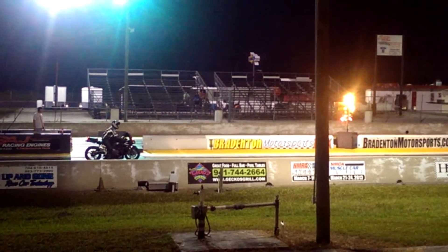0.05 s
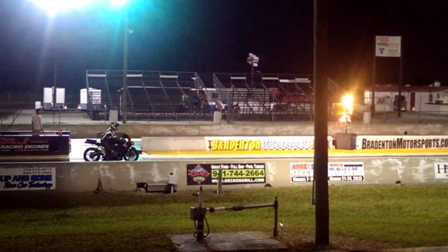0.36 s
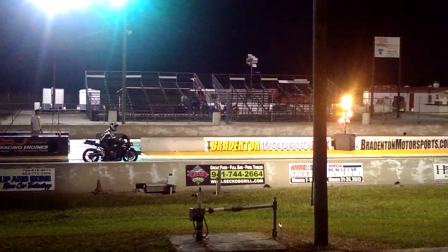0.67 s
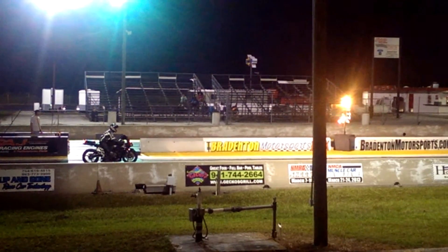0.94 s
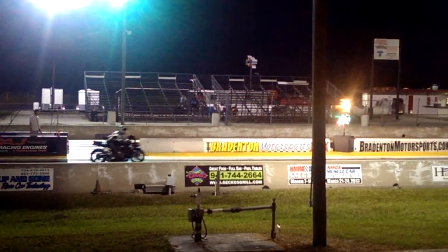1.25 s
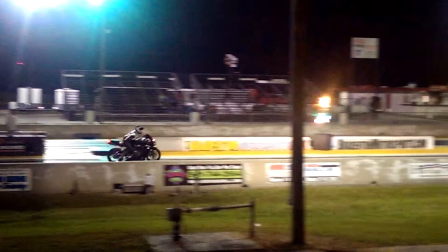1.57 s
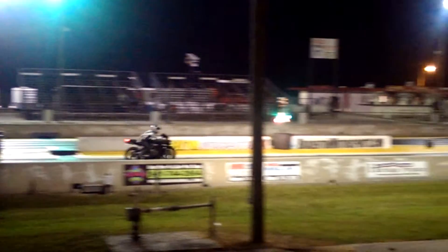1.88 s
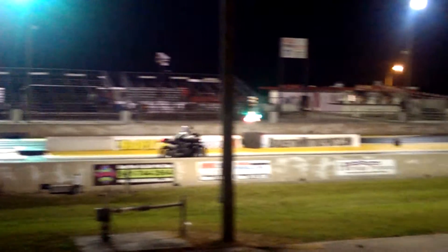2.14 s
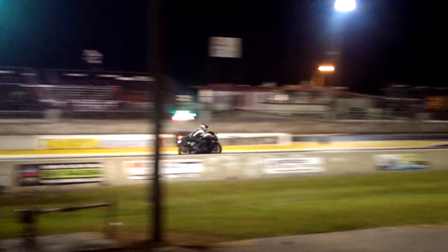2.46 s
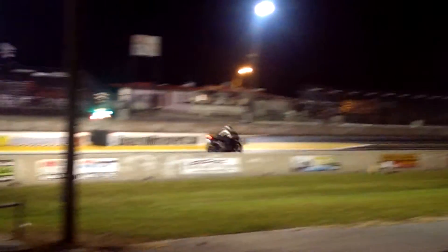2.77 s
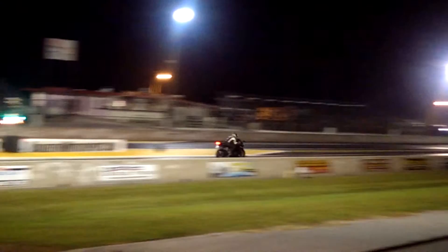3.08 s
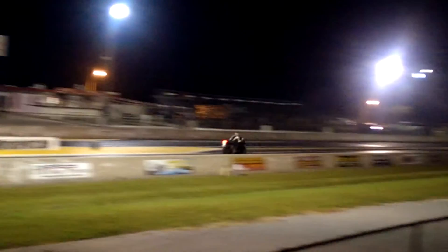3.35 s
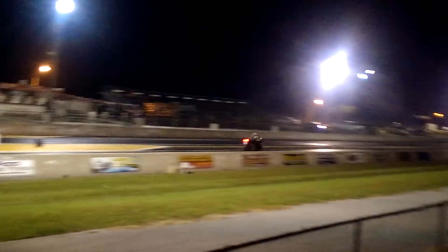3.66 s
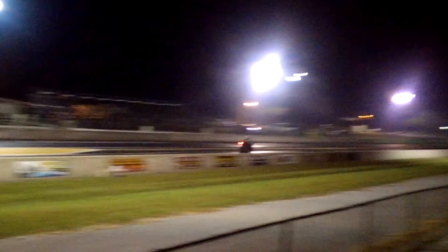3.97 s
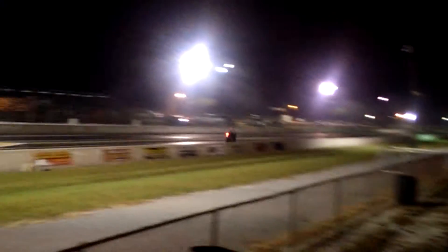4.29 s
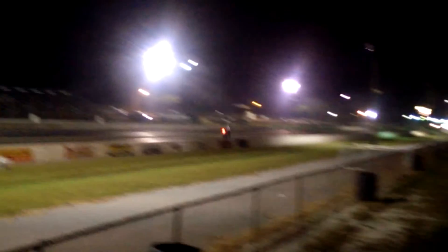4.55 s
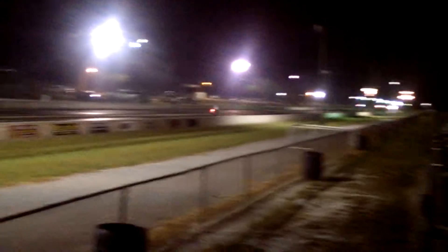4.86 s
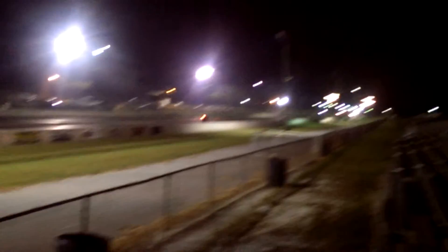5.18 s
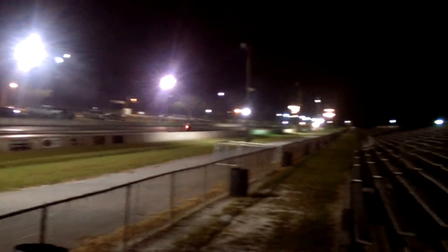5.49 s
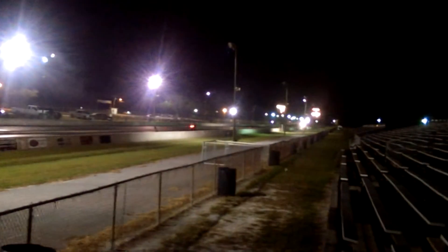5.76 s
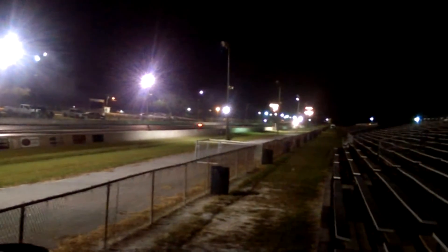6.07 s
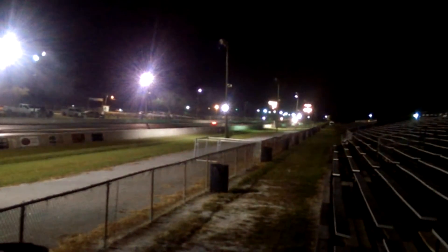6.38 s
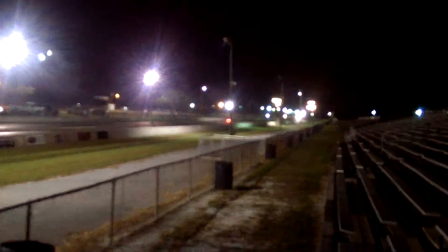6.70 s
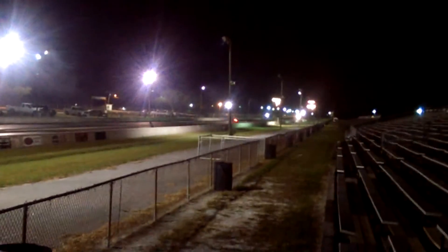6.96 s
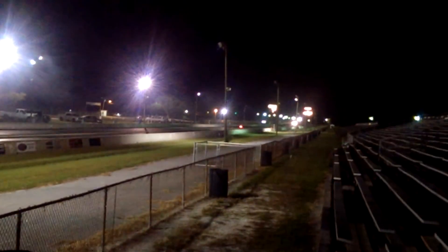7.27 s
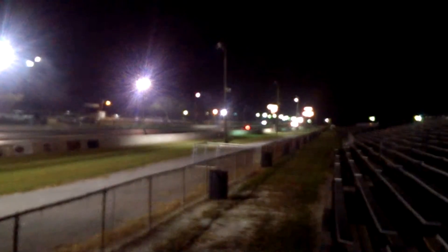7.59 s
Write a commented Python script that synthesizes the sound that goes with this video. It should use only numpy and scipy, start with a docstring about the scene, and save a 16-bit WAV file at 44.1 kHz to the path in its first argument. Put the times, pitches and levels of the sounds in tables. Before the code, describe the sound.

A four-cylinder motorcycle holds a muffled, slightly lumpy hum on the start line of an outdoor drag strip, over a low rumble with faint engine clatter. At about 1 second it launches with a pop and the revs flare loudly, peaking near 1.4 seconds, then sag as the clutch bites. From about 2.5 seconds the throttle opens wide and the pitch climbs steadily into a booming, barking howl with a raspy edge as the bike runs away. Around 5.3 seconds the engine stutters on its rev limiter with a few sharp pops, then shifts up at 5.6 seconds, dropping in pitch and pulling again. The howl wavers and fades with distance. A fainter stutter, pop and second upshift come at about 7.5 to 7.7 seconds. Heard from trackside, the exhaust echoes off the walls and stands throughout.

```python
"""A four-cylinder motorcycle hums on the start line of a drag strip, over the rumble of the grounds.
Track walls and stands throw its sound back. After a second it launches with a pop: the revs flare,
sag as the clutch bites, then climb. Every firing is a pressure spike on top of the exhaust pipe's boom.
The pipe swings round to face the listener as the bike runs away. Twice the engine stutters and pops
on its rev limiter and shifts up, while it fades into the distance."""
import sys
import numpy as np
from scipy import signal
from scipy.fft import rfft, irfft
from scipy.io import wavfile
from scipy.ndimage import uniform_filter1d, map_coordinates

SR = 44100
rng = np.random.default_rng(int(sys.argv[2]) if len(sys.argv) > 2 else 0)


def unload_wav(signal):
    """Save mono or channel-first audio to the path in sys.argv[1] as 16-bit WAV at rate SR, clipped to [-1, 1]."""
    wavfile.write(
        sys.argv[1],
        SR,
        np.round(np.clip(np.atleast_2d(signal).T, -1, 1) * 32767).astype(np.int16),
    )


N = 345744
T = np.arange(N) / SR

# tones of the start-line hum and of its whine: (multiple of the firing rate, relative level [dB])
HUM_TONES = [(0.25, -38), (0.5, -20), (0.75, -25), (1, -2), (1.25, -11), (1.5, -9.5), (1.75, -21), (2, 1.5),
             (2.25, -40), (2.5, -23), (2.75, -32), (3, -10)]
WHINE_TONES = [(4, -20), (6, -21.5)]
# loudness of that hum: (time [s], level [dB])
HUM_LEVEL = [(0, -27.5), (.45, -29.5), (.7, -31.5), (1.0, -27.5), (1.1, -30), (1.2, -47)]
# rumble of the grounds with engine clatter: (frequency [Hz], relative level [dB])
RUMBLE_COLOUR = [(25, -40), (45, -9), (100, -12.5), (220, -7.5), (330, -13), (420, -26.5), (650, -18),
                 (950, -22), (1100, -26.5), (2200, -29.5), (2630, -22.5), (3100, -31), (3900, -31.5),
                 (4600, -37), (6500, -35.5), (7500, -43.5), (10500, -52), (13700, -45.5), (15500, -57)]
# the revs flare, then sag as the clutch bites: (time [s], firing rate [Hz])
LAUNCH_REVS = [(1.0, 108.2), (1.06, 125.6), (1.142, 181.9), (1.198, 221), (1.238, 236.6), (1.312, 262.1),
               (1.406, 269.2), (1.516, 248.8), (1.662, 193.8), (1.694, 189.8), (1.962, 193), (2.46, 138.1)]
# the rider feeds in throttle, backs off, then opens it wide: (time [s], opening [0-1])
THROTTLE = [(1.0, 0), (1.04, 0.06), (1.08, 0.04), (1.16, 0.41), (1.32, 0.52), (1.55, 0.45), (1.68, 0.39),
            (2.12, 0.36), (2.46, 0.11), (2.68, .25), (2.79, 0.55), (3.2, 0.97)]
# boom of the pipe from the side and from behind: (firing rate [Hz], level [dB])
BOOM_BESIDE = [(108, -36), (128, -26), (158, -15.5), (182, -18.5), (194, -14.5), (228, -14.5), (246, -16.5),
               (263, -27)]
BOOM_BEHIND = [(180, -15.5), (218, -25), (245, -19), (268, -20.5), (290, -16.5), (324, -14.5), (338, -22),
               (380, -21.5)]
# slow throb of unequal cylinders: (multiple of the firing rate, relative level [dB])
THROB_TONES = [(.25, -4.5), (.5, -11.5), (.75, -6.5), (1.25, -2), (1.5, -1.5)]
# what the pipe lets out of the throb and the boom's octave: (frequency [Hz], gain [dB])
PIPE_COLOUR = [(30, -23.5), (60, -4), (88, -6), (130, 11), (190, -3.5), (250, 4), (325, 0.5), (352, -0.5),
               (400, -10), (520, -14.5), (760, -21)]
# the four firings at full unevenness: (strength [dB], lateness [s])
CYLINDERS = [(3.5, 0), (-2.5, .00012), (-3.5, -.00006), (0, .00018)]
# exhaust bark from the side and behind, its crack, thump and pop: (frequency [Hz], gain [dB])
BARK_BESIDE = [(100, -10.5), (380, 0.5), (480, -0.5), (700, 4.5), (820, 1.5), (960, 8), (1130, 0),
               (1400, 5.5), (1700, -1), (1950, 4), (2300, -4), (2750, 1.5), (3100, -13), (3900, -4.5),
               (4700, -31), (6400, -17), (7500, -39.5)]
BARK_BEHIND = [(100, 3), (420, -9), (520, -1), (690, 3), (870, 5.5), (1130, -5.5), (1400, 2.5), (1650, 5.5),
               (1950, 8.5), (2350, 0), (2800, -6.5), (3600, -7.5), (5000, -22.5), (14000, -50.5)]
CRACK_COLOUR = [(600, -9), (2300, 7), (3300, 7), (4000, 5.5), (4800, 5.5), (6500, 0), (9000, -4.5),
                (10000, -14.5), (11500, -16), (13700, -9), (15500, -33)]
THUMP_COLOUR = [(40, -28), (90, -7.5), (165, -2), (260, -1.5), (390, -8.5), (500, -12.5), (900, -53.5)]
POP_COLOUR = [(60, -10), (200, 4), (500, 3), (900, -1.5), (1600, -11), (2500, -9), (8000, -24.5),
              (15000, -67)]
# unburnt fuel pops in the pipe: (time [s], peak level [dB])
POPS = [(1.04, -17.5), (5.314, -10), (5.571, -6), (5.6, -12), (7.701, -17.5)]
# each gear pulls the revs up: (start [s], time to engage [s], firing rate [Hz], climb [Hz/s])
GEARS = [(2.44, 0.027, 135.4, 92.14), (5.63, .05, 293.9, 40.07), (7.64, .13, 287.8, 25)]
# what ground and air do over the length of the strip: (frequency [Hz], gain [dB])
FAR_COLOUR = [(500, 1), (720, 0.5), (930, 3.5), (1200, -1), (1550, 5), (1950, -6.5), (3500, 1.5),
              (9000, 4.5), (14000, -2)]
# the rev limiter cuts in: (start [s], end [s], thump level [dB])
LIMITER = [(5.292, 5.636, -27), (7.477, 7.738, -37)]
# how the microphone's two sides differ: (frequency [Hz], left minus right [dB])
MIC_BALANCE = [(60, -2), (110, -1), (200, -1.5), (380, -2), (700, -0.5), (1290, 6.5), (2380, 1.5),
               (4400, -1.5), (8120, 13.5), (15000, 7.5)]


def undb(db):
    """Turn decibels into a gain to multiply by."""
    return 10 ** (np.asarray(db) / 20)


def curve(rows):
    """Join (time, value) rows with straight lines."""
    return np.interp(T, *np.transpose(rows))


def unit(x):
    """Scale to an average power of 1."""
    return x / np.sqrt(np.mean(x ** 2))


def even(x, size=4000):
    """Hold the running power at 1, keeping the single pulses."""
    power = uniform_filter1d(uniform_filter1d(x ** 2, size), size)
    return x / np.sqrt(np.abs(power) + 1e-9 * np.mean(x ** 2))


def spectrum(points, hz):
    """Read the level at `hz` from (frequency, level) rows."""
    frequencies, db = np.transpose(points)
    return np.interp(np.log(hz + 1), np.log(frequencies), db)


def colour(x, points, size=4096):
    """Filter a sound by (frequency, gain) rows."""
    cepstrum = irfft(np.log(undb(spectrum(points, np.fft.rfftfreq(size, 1 / SR)))))
    # make the filter ring only after the sound, never before
    cepstrum[1:size // 2] *= 2
    cepstrum[size // 2 + 1:] = 0
    return signal.fftconvolve(x, irfft(np.exp(rfft(cepstrum))))[:N]


def walk(rate):
    """A smooth random wobble that changes `rate` times a second."""
    step = int(SR / rate)
    stairs = np.repeat(rng.standard_normal(N // step + 2), step)
    return unit(uniform_filter1d(stairs, step)[:N])


def spikes(times, sizes, half_width=8):
    """Clean clicks at exact times, even between samples."""
    at = np.asarray(times)[:, None] * SR
    index = at.astype(int) + np.arange(1 - half_width, half_width + 1)
    shape = np.sinc(index - at) * np.sinc((index - at) / half_width)
    return np.bincount(np.clip(index, 0, N).ravel(), (shape * sizes[:, None]).ravel(), N + 1)[:N]


def delayed(x, seconds):
    """The sound after a path whose length may change."""
    return map_coordinates(x, [(T - seconds) * SR], order=1)


def revs(idle_hz=107.3, redline_hz=386.9, knee_hz=22.02):
    """Firings per second: settling on the line, flaring at the launch, climbing through the gears."""
    settling = idle_hz + 8 * np.exp(-T / .25)
    hz = np.where(T < LAUNCH_REVS[0][0], settling, curve(LAUNCH_REVS))
    for start, engage, from_hz, climb in GEARS:
        pull = from_hz + climb * (T - start)
        # the climb flattens near the top
        pull = redline_hz - knee_hz * np.logaddexp(0, (redline_hz - pull) / knee_hz)
        hz = hz + (pull - hz) * np.clip((T - start) / engage, 0, 1)
    return hz


def crank(hz, wobble_s=.00005):
    """Count the firings so far; the crankshaft never turns quite evenly."""
    return np.cumsum(hz) / SR + hz * wobble_s * walk(30)


def idle(fired, flutter_db=2.1):
    """The engine's muffled, slightly lumpy hum before the launch."""
    hum = sum(undb(db - flutter_db * walk(25)) * np.cos(2 * np.pi * (multiple * fired + rng.random()))
              for multiple, db in HUM_TONES + WHINE_TONES)
    return unit(hum) * undb(curve(HUM_LEVEL)) * (T < HUM_LEVEL[-1][0])


def grounds(level_db=-38.5, flicker_db=1.5, leave_db=-5):
    """Rumble and engine clatter that ease as the bike leaves; the bass is alike in both ears."""
    noises = (rng.standard_normal(N) * undb(flicker_db * walk(60)) for _ in range(2))
    middle, side = (unit(colour(noise, RUMBLE_COLOUR)) for noise in noises)
    side = colour(side, [(60, -11.5), (300, -10.5), (1000, -3), (3000, -2.5)])
    return (middle + np.outer([1, -1], side)) * undb(level_db + np.interp(T, [2, 6], [0, leave_db]))


def scatter(x, decay_s, size=16384):
    """A wash of echoes whose pattern keeps changing as the bike moves."""
    out, age = np.zeros(N + 4 * size), T[:2 * size]
    x, window = np.pad(x, size), np.sqrt(np.hanning(size))
    fade = undb(-60 * age / decay_s) * (age > .001)
    for start in range(0, N + size, size // 2):
        echoes = unit(rng.standard_normal(len(age)) * fade) / np.sqrt(len(age))
        piece = signal.fftconvolve(x[start:start + size] * window, echoes)
        out[start:start + len(piece)] += piece
    return out[size:size + N]


def track_echoes(bike, wall_db=-9, stand_db=-11, tail_db=-14, gust_s=.00019):
    """Add echoes from walls and benches, a late slap from the stands and an open-air tail."""
    away = np.interp(T, [2, 6], [0, 1])
    swell = .5 + .5 * away
    bright = colour(bike, [(200, -21.5), (600, 3), (1500, 4), (5000, 4), (14000, 6.5)])
    dull = colour(bike, [(250, -4.5), (600, 8.5), (2000, 5.5), (6000, 11), (15000, -48)])
    stands = delayed(dull, seconds=.22 * (.6 + .4 * away)) * swell
    ears = []
    for wall_s in (.021 - .013 * away, .036 + .022 * away):
        benches = scatter(bright * undb(-7 + 4 * away), decay_s=.041, size=8192)
        tail = scatter(dull * swell, decay_s=.76)
        # moving air shifts the long path, so single overtones swell and fade
        wall = delayed(bright, wall_s + gust_s * away * walk(14))
        ears.append(benches + undb(wall_db) * wall + undb(tail_db) * tail)
    return bike + undb(stand_db) * stands + np.array(ears)


def strain(hz, relaxed, strained):
    """Slide between two values as rising revs put the cylinders out of balance."""
    return np.interp(hz, [252, 336], [relaxed, strained])


def swing():
    """0 while the pipe is side-on, 1 once it faces the listener."""
    return np.interp(T, [2.65, 3.91], [0, 1])


def distance_db(loss_db_per_m, rolls_s=1.523, accel_m_s2=5.03, side_m=29.8):
    """Sound spreads out and is soaked up by ground and air as the bike speeds away."""
    travelled = accel_m_s2 * np.maximum(T - rolls_s, 0) ** 2 / 2
    metres = np.hypot(side_m, travelled)
    return -20 * np.log10(metres / side_m) - loss_db_per_m * (metres - side_m)


def boom(hz, fired):
    """The pipe breathes at the firing rate, with a tone an octave up and the cylinders' slow throb."""
    angle, behind = 2 * np.pi * fired, swing()
    ring_db = (1 - behind) * spectrum(BOOM_BESIDE, hz) + behind * spectrum(BOOM_BEHIND, hz)
    # the boom wavers more at high revs, as if beating against its echo
    waver_db = np.interp(hz, [315, 350], [1.1, 3.3])
    strength = undb(ring_db + upshift_db() + waver_db * walk(30))
    octave_db = np.interp(behind, [0, 1], [-9.5, -15]) + 3.5 * walk(18)
    octave = np.cos(2 * angle) * strength * undb(octave_db)
    throb = sum(undb(db + walk(14)) * np.cos(multiple * angle) for multiple, db in THROB_TONES)
    throb *= undb(strain(hz, -38.5, -22.5) + limiter_db())
    note = strength * np.cos(angle) + colour(octave + throb, PIPE_COLOUR)
    return np.sqrt(2) * note * undb(distance_db(loss_db_per_m=.01) + limiter_db())


def firings(hz, fired, spark, jitter_s=.000025, limiter_jitter_s=.00044):
    """Time and strength of each firing; unequal pipes make some stronger and some later."""
    number = np.arange(1, int(fired[-1]))
    times = np.interp(number, fired, T)
    at = (times * SR).astype(int)
    db, late_s = np.array(CYLINDERS)[number % 4].T * strain(hz[at], .55, .95)
    spread_s = jitter_s + limiter_jitter_s * np.abs(1 - spark[at])
    return times + late_s + spread_s * rng.standard_normal(len(times)), undb(db) * spark[at]


def exhaust_levels(bark_full_opening=.48):
    """Levels in dB of bark and crack, from throttle, aim of the pipe and distance."""
    opening, behind = np.maximum(curve(THROTTLE), 1e-3), swing()
    push_db = 20 * np.log10(np.minimum(opening / bark_full_opening, 1))
    aim_db = 2 * behind ** 2 - 6 * np.sin(np.pi * behind)  # dips in mid-swing
    bark_db = -21.5 + push_db + aim_db + distance_db(loss_db_per_m=.18) + limiter_db()
    beam_db = np.interp(T, [3.89, 4.57], [0, 7])  # the crack's narrow beam comes round later
    crack_db = -27.5 + 28 * np.log10(opening) + beam_db + distance_db(loss_db_per_m=.69)
    return bark_db, crack_db


def bark(fired, times, sizes, bark_db, crack_db, gas_db=-13, hiss_db=-7, beat_hz=12):
    """Pressure spikes with a puff of gas behind each; their fronts steepen into uneven cracks."""
    pulses = even(spikes(times, sizes))
    puffs = np.exp(-(fired % 1) / .5) * np.interp(T, times, sizes)
    gas = even(puffs * rng.standard_normal(N))
    flow = pulses + undb(gas_db) * gas / 2
    behind = swing()
    body = (1 - behind) * colour(flow, BARK_BESIDE) + behind * colour(flow, BARK_BEHIND)
    jitter_s, uneven_db = rng.normal(0, [.00012, 3.5], (len(times), 2)).T
    fronts = even(spikes(times + jitter_s, sizes ** .11 * undb(uneven_db)))
    crack = colour(fronts + undb(hiss_db) * gas, CRACK_COLOUR)
    # far away the tone changes and the howl pulses, as if beating against its echo
    far = np.interp(T, [4.1, 5.9], [0, 1])
    body, crack = (even((1 - far) * x + far * colour(x, FAR_COLOUR)) for x in (body, crack))
    beat_db = 2 * far * np.sin(2 * np.pi * (beat_hz * T + .36 * walk(7)))
    return body * undb(bark_db + beat_db) + crack * undb(crack_db + 1.04 * walk(25))


def thumps(times, sizes, bark_db, below_bark_db=17):
    """The pipe thumps at random: softly under the bark, harder while the rev limiter cuts in."""
    knocks = spikes(times, sizes * rng.standard_normal(len(times)))
    cuts = sum(undb(db) * ((T > start) & (T < end)) for start, end, db in LIMITER)
    level = uniform_filter1d(cuts, size=500) + undb(bark_db - below_bark_db)
    return even(colour(knocks, THUMP_COLOUR)) * level


def fuel_pops():
    """Unburnt fuel goes off in the pipe and makes it ring."""
    times, db = np.transpose(POPS)
    pops = colour(spikes(times, undb(db)), POP_COLOUR)
    return pops * undb(db.max()) / np.abs(pops).max()


def limiter_stutter(rate_hz=200, depth=.33):
    """Firing strength: normally 1, but jumping up and down while the rev limiter cuts in."""
    limited = sum((T > start) & (T < end) for start, end, _ in LIMITER)
    return 1 + limited * depth * np.tanh(3 * walk(rate_hz))


def limiter_db(sag_db=-5, sag_s=.22):
    """The engine loses power for as long as the limiter cuts in."""
    return sag_db * sum(np.clip((T - start) / sag_s, 0, 1) * (T < end) for start, end, _ in LIMITER)


def upshift_db(swell_db=4.5, fade_s=.21):
    """Each upshift dumps the crankshaft's momentum into a swell of boom."""
    swell = np.zeros(N)
    for start, engage, _, _ in GEARS[1:]:
        rise = np.clip((T - start) / engage, 0, 1)
        swell += rise * np.exp(-(np.maximum(T - start - engage, 0) / fade_s) ** 2)
    return swell_db * swell


def scene():
    """One crankshaft drives the hum and the exhaust; echoes and rumble surround them."""
    hz = revs()
    fired, spark = crank(hz), limiter_stutter()
    times, sizes = firings(hz, fired, spark)
    bark_db, crack_db = exhaust_levels()
    exhaust = boom(hz, fired) * spark + bark(fired, times, sizes, bark_db, crack_db)
    exhaust += thumps(times, sizes, bark_db) + fuel_pops()
    launched = np.interp(T, [.95, 1.03], [0, 1])
    return track_echoes(idle(fired) + launched * exhaust) + grounds()


def record(dry, right_lag_s=.00006, low_cut_hz=28, top_hz=15400):
    """A microphone whose two sides differ in tone; deep bass, big peaks and the very top are cut."""
    hz = np.fft.rfftfreq(N, 1 / SR)
    lean_db = spectrum(MIC_BALANCE, hz) / 2
    sides = np.array([undb(lean_db), undb(-lean_db) * np.exp(-2j * np.pi * hz * right_lag_s)])
    sound = irfft(rfft(dry) * sides, N)
    sound = signal.sosfilt(signal.butter(2, low_cut_hz, "highpass", fs=SR, output="sos"), sound)
    top_cut = signal.ellip(10, .2, 80, top_hz, fs=SR, output="sos")
    return signal.sosfilt(top_cut, np.clip(sound, -.9, .9))


dry = scene()
out = record(dry)
unload_wav(out)
```